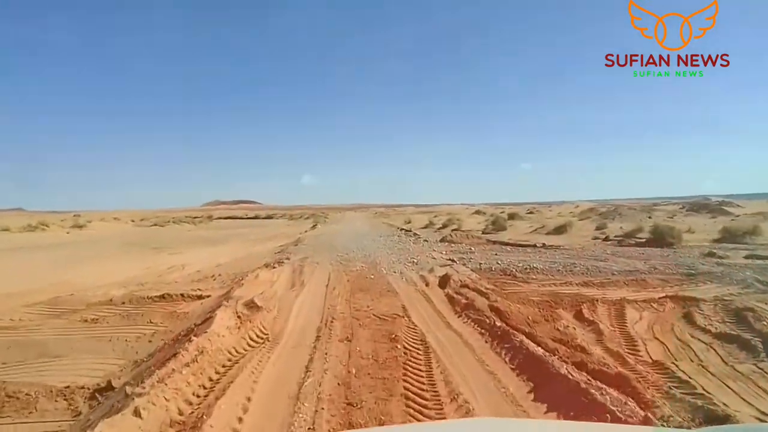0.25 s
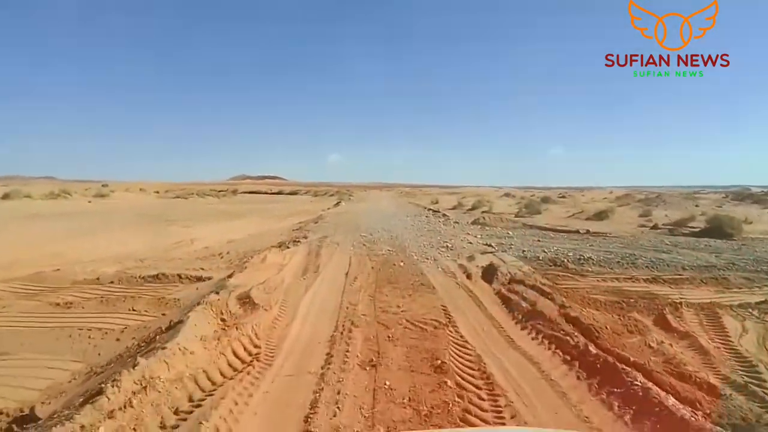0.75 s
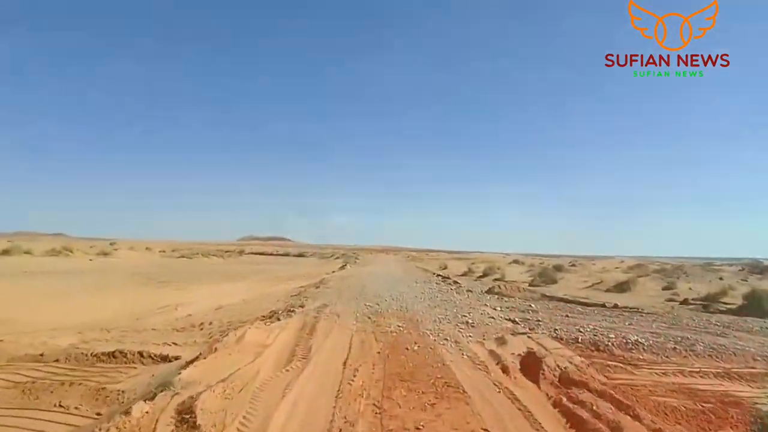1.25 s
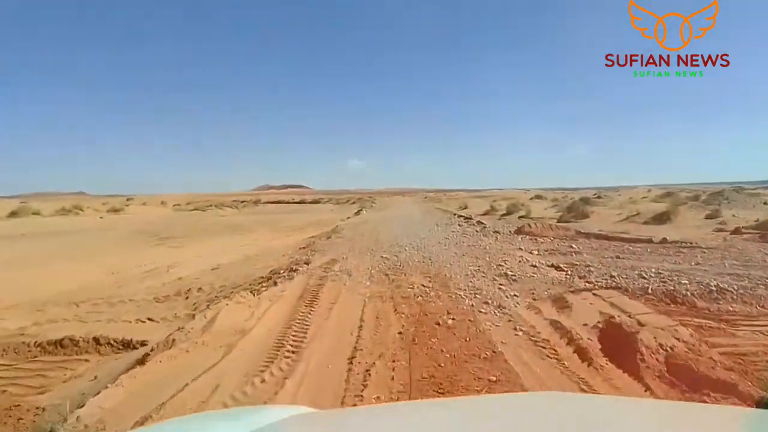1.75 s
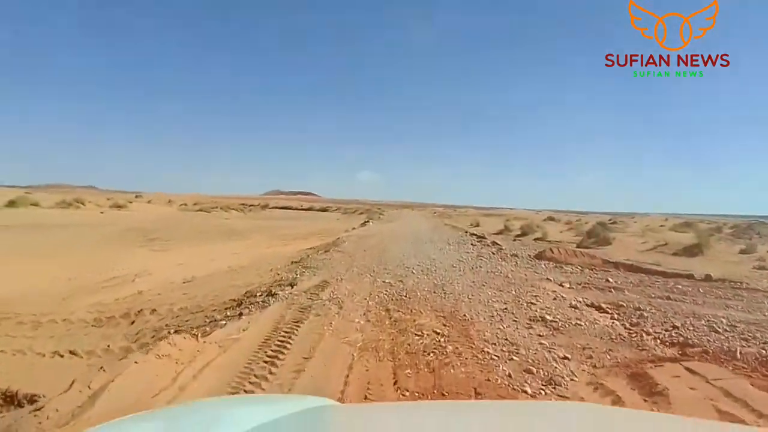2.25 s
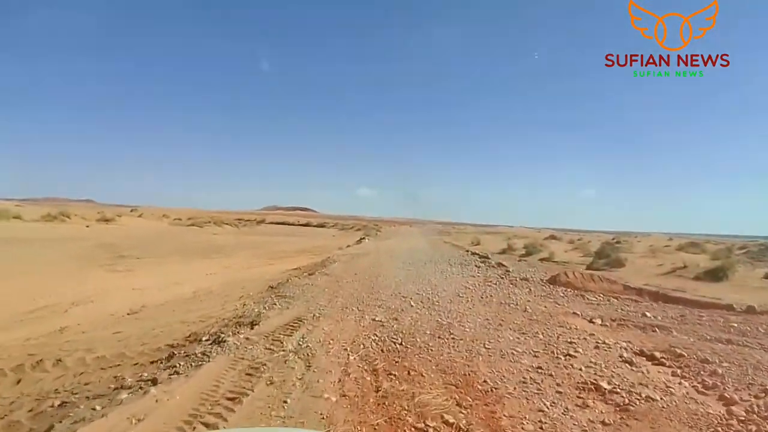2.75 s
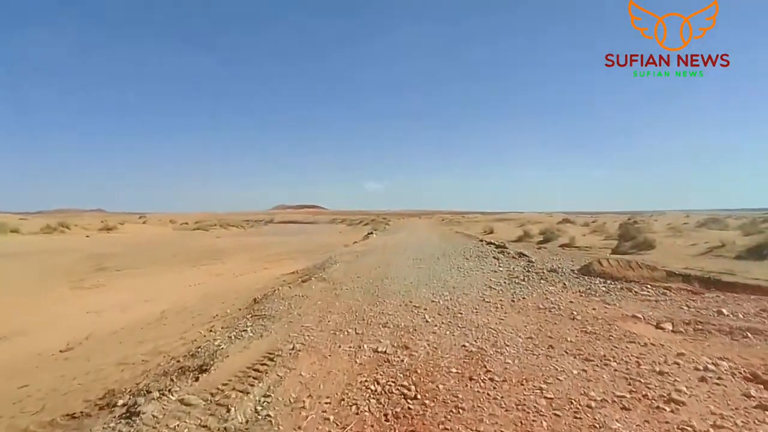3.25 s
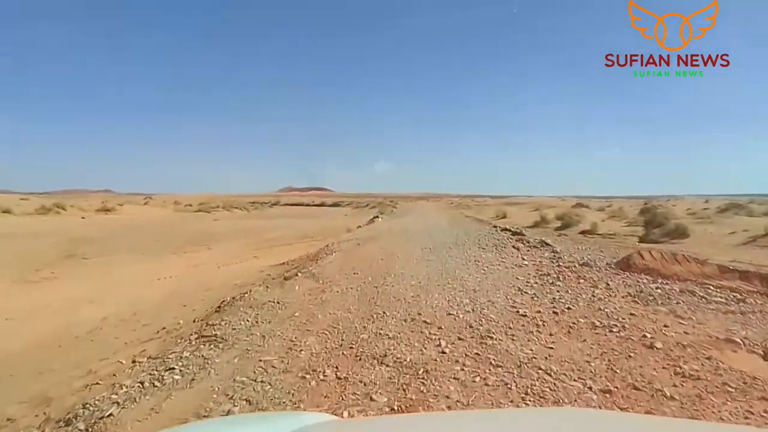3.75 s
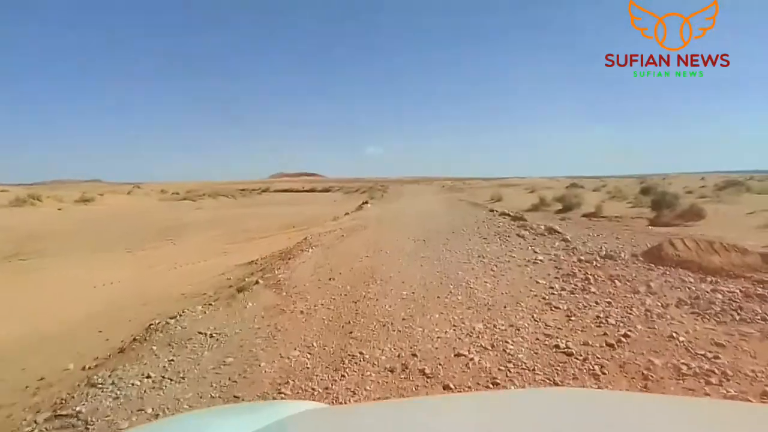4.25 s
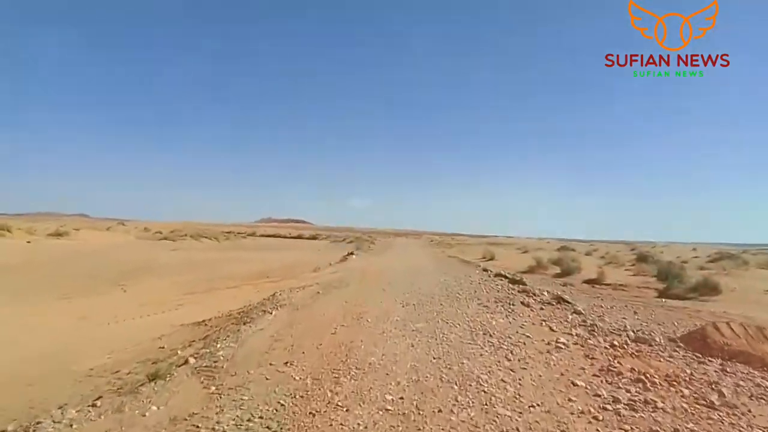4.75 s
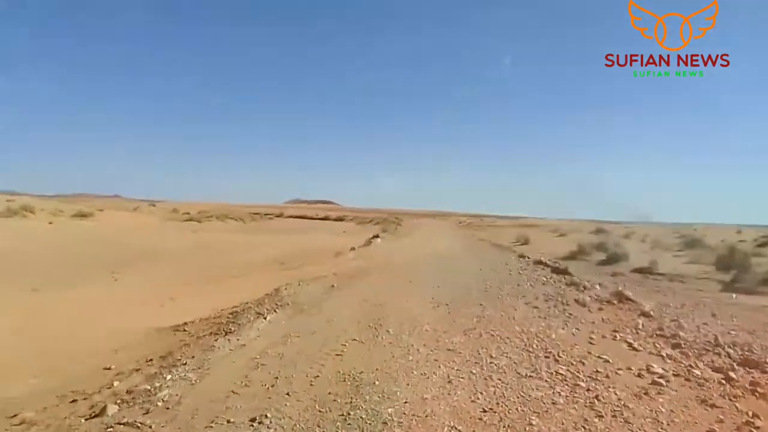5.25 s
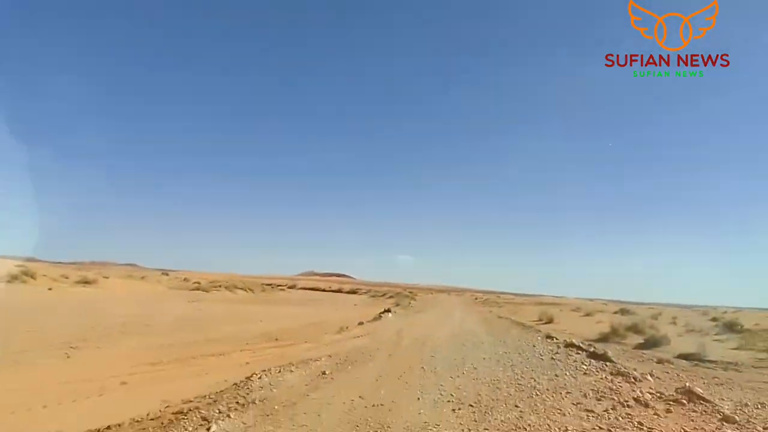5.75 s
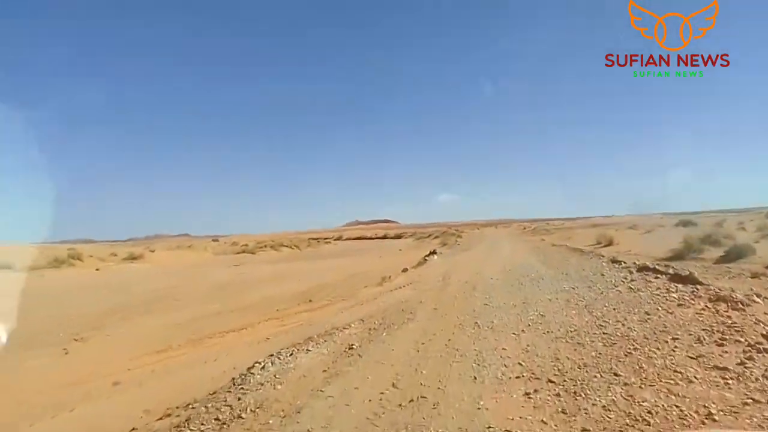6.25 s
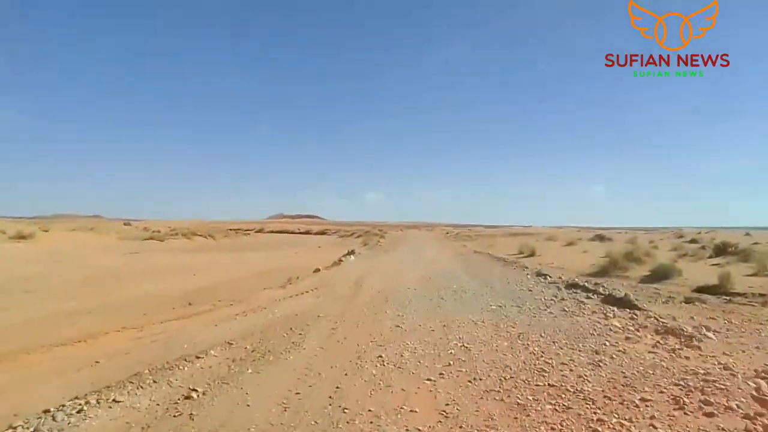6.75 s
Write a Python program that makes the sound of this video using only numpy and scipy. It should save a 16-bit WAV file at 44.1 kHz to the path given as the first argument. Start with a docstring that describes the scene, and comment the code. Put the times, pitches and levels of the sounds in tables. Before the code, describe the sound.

A car drives from soft sand onto a stony, rippled track. First there is mostly deep engine drone, body shudder and soft tread noise. Then gravel grinds, stones thump the underside, grit hisses in the wheel arches and small loose metal clinks. Panels chatter about fourteen times a second in uneven bouts. The microphone sits inside the small, damped cabin, so the outside sounds are muffled.

```python
"""Car interior, sand to washboard

Inside a car that rolls over soft sand and then, after some three seconds, onto a stony washboard track.
Engine: low sine orders. Body, cabin air and tyres: noise and random lumps through low resonances and filters.
Gravel and sand: random contacts, coloured and ringing, that crunch and tick underneath.
Trim: chatter on ripples about fourteen times a second rings the plastic panels; small loose metal jingles."""
import sys
import numpy as np
from scipy import signal
from scipy.fft import rfft, irfft, next_fast_len
from scipy.io import wavfile
from scipy.ndimage import uniform_filter1d, map_coordinates

SR = 44100
rng = np.random.default_rng(int(sys.argv[2]) if len(sys.argv) > 2 else 0)


def persist_wave(psi):
    """Save psi, clipped to +-1, as 16-bit WAV."""
    counts = np.round(np.clip(psi, -1, 1) * 32767).astype(np.int16)
    wavfile.write(sys.argv[1], SR, np.atleast_2d(counts).T)


N = 308700

# ground under the wheels: [time_s, stoniness (0-1), roughness_db]
GROUND_CURVE = [(0, 0.15, -11.5), (1, 0.12, -14), (2.3, 0.05, -14.5), (3.05, 0, -9.5), (3.3, 0.01, 2.5),
                (3.75, 1, -5), (4.1, 0.87, 1.5), (4.5, 0.93, -2), (4.9, 0.85, 0.5), (5.55, 0.88, -2),
                (6.35, 0.9, -1), (6.8, 0.94, 3.5), (7, 0.76, -1)]
# upper edges of the tread roar and of the clatter: [time_s, roar_edge_hz, clatter_edge_hz]
EDGE_CURVES = [(0, 1074, 2600), (.8, 964, 2600), (2.1, 925, 2400), (2.4, 660, 2300), (2.6, 765, 2300),
               (3.0, 740.8, 2200), (3.33, 1149, 2000), (3.48, 742, 2180), (4.0, 760, 2500),
               (4.4, 810, 2700), (4.9, 850, 3100), (5.5, 880.3, 3000), (6.3, 900, 2550), (6.7, 950, 3200),
               (7, 950, 3300)]


def trim(rise_s, fall_s):
    """Each ripple jolts the plastic panels, which chatter against their seats and ring briefly."""
    # plastic panels: [freq_hz, width_hz, lift_db]
    soft_modes = [(722, 26, 13), (1085, 18, 14.5), (1142, 20, 12), (1320, 50, 5), (1590, 34, 12),
                  (1795, 40, 5), (1904, 42, 13), (2030, 50, 6), (2190, 70, 5), (2604, 30, 7),
                  (2773, 32, 11), (3360, 45, 8), (3631, 45, 9), (3878, 35, 9)]
    # clack of the panels on their seats: [freq_hz, density_db]
    soft_spectrum = [(300, -8), (520, -2.5), (730, -5), (900, -10), (1150, -4.5), (1450, -9), (1950, -5),
                     (2650, -14.5), (3000, -44), (3800, -26), (4500, -25.5), (8000, -56.5), (14000, -69)]
    # panels against their stops: [freq_hz, width_hz, lift_db]
    hard_modes = [(2740, 63, 1.5), (4050, 90, 3.5), (5100, 110, 5), (5450, 75, 4.5), (6750, 160, 5)]
    # clack of the panels on their stops: [freq_hz, density_db]
    hard_spectrum = [(2000, 0), (2750, 9), (3100, 5.5), (4100, -0.5), (4500, -15), (4900, -5.5),
                     (5450, -4.5), (5900, -24.5), (6700, -10), (9000, -15), (10500, -41.5)]
    # contact with the stops, and buzz in between: [time_s, hard_contact_db, buzz_db]
    hard_curve = [(4.88, -59, -83), (4.99, -40, -82), (5.12, -48, -89), (5.29, -41, -76), (5.5, -43, -86),
                  (6.45, -48.5, -76), (6.62, -35, -58), (6.78, -27.5, -57.5), (7, -38, -49)]

    shake = ripple_shake(rise_s, fall_s)
    chatter = even(grains(per_s=1700, spread_db=-0.5), span_s=0.0027)
    contacts = shake * chatter * from_db(0.75 * drift(60))

    soft = colour(ring(contacts, soft_modes, vary_db=3), soft_spectrum)
    soft = dull_above(soft, in_time(EDGE_CURVES)[1], treble_db=-13.5)

    hard_db, buzz_db = in_time(hard_curve)
    buzz = from_db(buzz_db) * stoniness() * chatter
    hard = ring(from_db(hard_db) * contacts + buzz, hard_modes, vary_db=2.5)
    return from_db(-17.5) * soft + colour(hard, hard_spectrum)


def ripple_shake(rise_s, fall_s):
    """Washboard jolts: each rises, holds while the tyre is on the crest, and falls."""
    # ripples: [start_s, contact_s, level_db]
    ripples = [(3.546, 0.035, -27.5), (3.618, 0.018, -16), (3.696, .032, -23.5), (3.808, 0.022, -35.5),
               (4.135, 0.051, -35.5), (4.205, 0.016, -36), (4.47, 0.013, -27), (4.604, 0.018, -17),
               (4.644, 0.0081, -17.5), (4.685, 0.021, -20), (4.758, 0.021, -16.5), (4.837, 0.035, -14.5),
               (4.907, 0.03, -17), (4.978, 0.03, -17.5), (5.055, 0.016, -25.5), (5.133, 0.022, -22),
               (5.205, 0.035, -19.5), (5.273, 0.057, -19), (5.364, 0.033, -14.5), (5.44, 0.024, -20),
               (5.868, 0.039, -30.5), (5.922, 0.031, -32), (5.994, 0.021, -27.5), (6.075, 0.016, -33),
               (6.153, 0.036, -24), (6.223, 0.021, -25), (6.415, 0.017, -31.5), (6.538, 0.024, -20),
               (6.616, 0.022, -16.5), (6.694, 0.015, -16.5), (6.767, 0.028, -15.5), (6.839, 0.04, -18.5),
               (6.909, 0.026, -11.5), (6.984, .025, -9.5)]
    t, shake = np.arange(N) / SR, np.zeros(N)
    for start_s, contact_s, level_db in ripples:
        first = int(start_s * SR)
        near = slice(first, first + SR // 5)
        age_s = np.maximum(t[near] - start_s, 0)
        rise = 1 - np.exp(-age_s / rise_s)
        fall = np.exp(-np.maximum(age_s - contact_s, 0) / fall_s)
        shake[near] += from_db(level_db) * rise * fall
    return shake


def body():
    """The shell shudders on its springs and the cabin air booms, far more on stones than on sand."""
    shudder_db, boom_db, sand_damping_db = -21.5, -23.5, 3  # levels at roughness and sway 0 dB
    rough_db, sway_db, _ = ride()
    motion_db = rough_db + sway_db
    boom_db = boom_db + motion_db - sand_damping_db * (1 - stoniness())
    shudder = from_db(shudder_db + motion_db) * body_mode(hz=23.5, width_hz=14)
    return shudder + from_db(boom_db) * body_mode(hz=61, width_hz=24)


def body_mode(hz, width_hz):
    """A low mode kept swinging by noise from the uneven ground."""
    noise = rng.standard_normal(N + SR)  # the first second lets the mode settle
    swing = resonate(resonate(noise, hz, width_hz), hz, width_hz)[SR:]
    return even(swing, span_s=0.23)


def tyres():
    """Lumps drum on the carcasses; the tread roars dully through the floor."""
    # carcass drumming: [freq_hz, density_db]
    drum_spectrum = [(40, -12), (60, -16.5), (82, -7), (102, 1), (118, 0), (142, 2), (175, -3.5), (215, -5),
                     (260, -11.5), (340, -28.5)]
    # tread roar: [freq_hz, density_db]
    roar_spectrum = [(200, -20), (280, 2), (350, 0), (480, -6), (550, -8), (650, -11.5), (850, -14.5),
                     (1150, -25), (1500, -31.5)]
    drum_db, roar_db, roar_follows = -22.5, -33, 0.67  # levels at roughness and load 0 dB

    rough_db, _, load_db = ride()
    push_db = rough_db + load_db
    drum = even(colour(grains(per_s=900, spread_db=3), drum_spectrum), span_s=0.14)
    roar = even(colour(grains(per_s=2500, spread_db=2.5), roar_spectrum), span_s=0.089)
    roar = roar * from_db(1.9 * drift(14))
    roar = dull_above(roar, in_time(EDGE_CURVES)[0], treble_db=-23.0)
    return from_db(drum_db + push_db) * drum + from_db(roar_db + roar_follows * push_db) * roar


def engine():
    """Four cylinders heard through the bulkhead: low sine orders that waver and flutter."""
    # engine: [time_s, firing_hz, level_db]
    engine_curve = [(0, 59.8, -31), (.35, 62.2, -34.5), (.62, 56.96, -34), (.88, 60.67, -31.5),
                    (1.2, 64.8, -31.5), (2.0, 64.52, -31), (2.35, 64.55, -35), (2.65, 62.23, -31.5),
                    (3.7, 60.8, -40.5), (4.05, 66, -29.5), (4.4, 62.94, -36), (5.85, 61.4, -29),
                    (6.3, 64.97, -31), (7, 66.17, -33)]
    # engine orders: [multiple of the firing rate, level_db]
    order_levels = [(.5, -8.5), (1, 1.5), (1.5, -10), (2, -9), (2.5, -23.5), (3, -13.5), (3.5, -21.5),
                    (4, -22), (4.5, -20), (5, -21), (6, -23.5), (7, -22), (7.5, -21), (8, -24), (10, -24)]
    waver_db, flutter_db, flutter_per_s = 1.5, 1.5, 22

    firing_hz, engine_db = in_time(engine_curve)
    jitter = 0.0051 * drift(8) + 0.0065 * drift(flutter_per_s)
    phase = 2 * np.pi * np.cumsum(firing_hz * (1 + jitter)) / SR
    orders = 0
    for multiple, level_db in order_levels:
        order = round(2 * multiple) / 2
        order_db = level_db + waver_db * drift(7) + flutter_db * drift(flutter_per_s)
        orders = orders + from_db(order_db) * np.sin(order * phase + rng.uniform(0, 2 * np.pi))
    return np.sqrt(2) * from_db(engine_db) * orders


def gravel():
    """Stones grind under the tread, grit sprays into the wheel arches, pebbles tick."""
    # wheel-arch liners: [freq_hz, width_hz, lift_db]
    arch_modes = [(1085, 20, 4), (1310, 90, 1), (1904, 45, 3), (3360, 60, 3), (3631, 50, 4), (3878, 50, 4)]
    # stones under the tyres: [time_s, crunch_db, grit_db]
    stone_curve = [(0, -58.5, -83.5), (.8, -63.5, -95.5), (2, -62, -94), (3.05, -60.5, -86.5),
                   (3.3, -60, -73.5), (3.45, -44, -69.5), (3.6, -39, -67.5), (3.9, -40, -82),
                   (4.15, -37, -51.5), (4.55, -37, -57.5), (4.7, -36, -57.5), (4.82, -34.5, -70),
                   (5.12, -35.5, -67.5), (5.42, -36.5, -55), (5.65, -38.5, -59.5), (6.1, -38.5, -62.5),
                   (6.36, -39.5, -79), (6.5, -33.5, -61), (6.65, -32.5, -53.5), (7, -32, -51)]
    crunch_db, grit_db = in_time(stone_curve)
    flung_stones, flung_grit = spray()
    crunch = stone_crunch() * np.hypot(from_db(crunch_db), flung_stones)
    crunch = hollow_out(crunch)
    grit = arch_hiss(flying_grit() * np.hypot(from_db(grit_db), flung_grit))
    in_arches = ring(from_db(0.5) * crunch + from_db(-2.5) * grit, arch_modes, vary_db=2.0)
    return in_arches + from_db(9.5) * pebble_ticks()


def stone_crunch():
    """Stones grind and clack under the tread; sand cushions them and dulls the crunch."""
    # grinding stones: [freq_hz, density_db]
    crunch_spectrum = [(400, -6), (620, -0.5), (900, -1.5), (1120, -0.5), (1330, 5.5), (1520, -1.5),
                       (1900, -6), (2500, -11), (2950, -35), (4500, -52.5)]
    stony = stoniness()
    grinding = colour(grains(per_s=1000, spread_db=0.0) * from_db(1.5 * drift(18)), crunch_spectrum)
    clacks = own_pitches(grains(per_s=110, spread_db=1.5), low_hz=650, high_hz=2400, q=24)
    crunch = from_db(-0.3) * grinding + from_db(-6) * stony * clacks
    crunch = crunch * tyre_grip()
    muffled = signal.sosfilt(signal.butter(2, 1700, fs=SR, output="sos"), crunch)
    crunch = np.sqrt(stony) * crunch + np.sqrt(1 - stony) * muffled
    return dull_above(crunch, in_time(EDGE_CURVES)[1], treble_db=-7)


def tyre_grip():
    """Gain of the crunch: the tyres bite on each crest and go light in the trough beside it."""
    ripple_period_s, swing_db, onset_db = .072, 2.5, -28
    shake = ripple_shake(rise_s=.004, fall_s=.008)
    usual = uniform_filter1d(shake, int(ripple_period_s * SR))
    return from_db(swing_db * (shake - usual) / (usual + from_db(onset_db)))


def hollow_out(crunch):
    """The crunch turns hollow at times, as a band near 1500 Hz is subtracted."""
    # hollowness: [time_s, depth of the dip (0-1)]
    hollow_curve = [(3.6, 0), (4, 1), (4.5, 0.39), (4.8, 0.23), (5.95, 0), (6.15, 0.99), (6.5, 0.93),
                    (6.7, 0.35)]
    depth = np.clip(in_time(hollow_curve)[0], 0, 1)
    return crunch - depth * resonate(crunch, hz=1500, width_hz=320)


def flying_grit():
    """Clumps of flying grains, fewer on soft sand, so that each is heard more singly."""
    # grit: [freq_hz, density_db]
    grit_spectrum = [(1500, -5), (2600, 6.5), (3050, -7), (3550, 1), (4000, -1), (4400, -16), (5300, -13.5),
                     (6100, -21), (7100, -19.5), (9000, -32.5), (15000, -33.5)]
    contacts = grains(per_s=500 + 4000 * stoniness(), spread_db=4.0)
    return colour(even(contacts * from_db(3.7 * drift(15)), span_s=0.1), grit_spectrum)


def arch_hiss(grit):
    """On stones the grit hisses in the wheel arches: a narrow band with a moving centre is added."""
    # hiss in the wheel arches: [time_s, centre_hz]
    hiss_curve = [(3.6, 3880), (4.45, 3930), (4.9, 3760), (5.35, 3490), (5.6, 3430), (5.9, 3690),
                  (6.2, 3800), (7, 3750)]
    band = moving_band(grit, in_time(hiss_curve)[0], width_hz=160)
    return grit + from_db(6) * stoniness() * band


def spray():
    """Gains of the stones and of the grit flung up into the wheel arches."""
    # sprays: [centre_s, half_length_s, stones_db, grit_db]
    sprays = [(0.118, 0.0081, -50, -78), (0.23, 0.016, -56, -88), (2.652, 0.015, -52, -76),
              (3.164, 0.01, -53, -71), (3.285, 0.014, -46.5, -78), (3.333, 0.015, -41, -83),
              (3.561, 0.016, -34.5, -71), (3.64, 0.017, -33, -46.5), (4.005, 0.033, -32, -57),
              (4.145, 0.056, -31, -45), (4.264, 0.0099, -34.5, -47.5), (4.427, 0.0072, -29.5, -49),
              (4.99, 0.019, -29.5, -62), (5.284, 0.023, -34.5, -45), (5.837, 0.094, -38, -50.5)]
    centre_s, half_s, stones_db, grit_db = np.transpose(sprays)
    return swells(centre_s, half_s, from_db(stones_db)), swells(centre_s, half_s, from_db(grit_db))


def pebble_ticks():
    """Pebbles skitter along the underside, each a short patter of tiny contacts."""
    # pebbles: [start_s, level_db]
    set_pebbles = [(.09, -60.5), (.283, -63), (.553, -67), (.655, -59.5), (.735, -68), (.782, -67),
                   (.952, -64), (1.005, -63), (1.04, -67), (1.1, -65), (1.142, -72), (1.262, -63),
                   (1.303, -65), (1.35, -68), (1.398, -69), (1.5, -73), (1.57, -69), (1.6, -70),
                   (1.635, -65), (1.975, -68), (2.29, -71), (2.62, -65), (2.707, -63.5), (3.42, -53),
                   (3.479, -49.5), (3.722, -53.5), (3.848, -60), (4.262, -49), (4.582, -54), (4.652, -45.5),
                   (5.056, -51), (5.94, -49), (6.49, -49), (6.672, -44)]
    # pebble tick: [freq_hz, density_db]
    tick_spectrum = [(600, -5), (1350, 4.5), (2200, -6.5), (4000, -10.5), (5500, -18), (8300, -19.5),
                     (12000, -40)]
    rows = set_pebbles + stray_pebbles()
    return colour(skitter(rows, rise_s=0.00081, decay_s=0.009), tick_spectrum)


def stray_pebbles():
    """Small pebbles fly up at random, harder on stony ground: rows of (start_s, level_db)."""
    per_s, sand_db, stones_add_db, spread_db = 8.5, -80.5, 12, 3
    at = np.flatnonzero(rng.random(N) < per_s / SR)
    level_db = sand_db + stones_add_db * stoniness() + spread_db * rng.standard_normal(N)
    return list(zip(at / SR, level_db[at]))


def stone_knocks():
    """Larger stones hit the damped floor pan with a short, dull knock."""
    # knocks: [start_s, level_db]
    knocks = [(3.395, -34.5), (3.422, -31), (3.453, -32), (3.479, -17.5), (3.579, -26.5), (3.697, -21.5),
              (4.074, -30.5), (4.143, -18), (4.769, -29), (4.92, -22), (5.136, -31), (5.173, -24.5),
              (5.584, -25.5), (6.266, -39.5), (6.296, -31.5), (6.772, -20), (6.843, -18)]
    # floor pan: [freq_hz, density_db]
    knock_spectrum = [(250, -6), (600, 3.5), (900, -2), (1250, 5.5), (1900, -8.5), (2300, -22), (2900, -31),
                      (5000, -43), (12000, -57)]
    return from_db(15.0) * colour(blows(knocks, decay_s=0.006, scatter=0.18), knock_spectrum)


def loose_metal():
    """Small metal parts tremble on the stones and under each spray, clink, and ping faintly."""
    # loose metal knocking: [start_s, level_db]
    jingles = [(3.477, -58.5), (3.6346, -58), (3.7439, -44), (3.8122, -39), (3.8886, -47), (3.9772, -40.5),
               (4.1116, -39), (4.2579, -56), (5.2754, -54), (5.5832, -45.5), (5.7903, -32.5), (5.8817, -44),
               (6.114, -44), (6.2076, -39), (6.548, -47), (6.6707, -45)]
    # loose metal: [freq_hz, width_hz, lift_db]
    metal_modes = [(3980, 90, 9), (7140, 90, 5), (7384, 80, 4), (7555, 80, 4), (7990, 80, 6),
                   (8384, 100, 7), (8600, 100, 4)]
    # metal tick: [freq_hz, density_db]
    tick_spectrum = [(3000, -18.5), (3900, -9.5), (4600, -16), (6200, -17.5), (7100, -12.5), (8300, 9),
                     (8900, -8), (10000, -25.5), (15000, -34.5)]
    # pings of a metal ring: [start_s, level_db]
    ping_rows = [(1.71, -75), (1.77, -75), (1.89, -77), (2.823, -64), (2.91, -62), (2.95, -69),
                 (3.045, -71), (3.075, -69), (3.232, -70), (6.284, -60), (6.316, -52)]
    tremble_db, spray_db = -71, -12.5  # spray against its grit

    rough_db, _, _ = ride()
    drive = from_db(tremble_db + rough_db) + from_db(spray_db) * spray()[1]
    patter = even(grains(per_s=1200, spread_db=3.5) * from_db(4.5 * drift(30)), span_s=0.09)
    tremble = stoniness() ** 2 * drive * patter
    contacts = tremble + from_db(0.5) * blows(jingles, decay_s=0.0059, scatter=0.3)
    jingle = colour(ring(contacts, metal_modes, vary_db=1.5), tick_spectrum)
    pings = resonate(blows(ping_rows, decay_s=.012, scatter=.05), hz=4030, width_hz=55)
    return from_db(0.5) * jingle + from_db(40) * pings


def showers():
    """Fine grit sweeps over the sheet metal in bright surges."""
    # surges: [centre_s, half_length_s, level_db]
    surges = [(4.026, 0.018, -51), (4.147, 0.03, -46.5), (4.263, .014, -50.5), (4.313, 0.079, -67),
              (5.81, 0.019, -52), (5.9, 0.042, -61)]
    # hiss of the grit: [freq_hz, density_db]
    hiss_spectrum = [(5000, -12.5), (6300, -13), (7000, 3), (8300, -0.5), (9300, -3), (10500, -19),
                     (12000, -28), (15000, -23)]
    centre_s, half_s, level_db = np.transpose(surges)
    patter = even(grains(per_s=3400, spread_db=3.5), span_s=0.033)
    return swells(centre_s, half_s, from_db(level_db)) * colour(patter, hiss_spectrum)


def sand():
    """Fine grains crackle against the underside in small uneven clumps."""
    # sand crackle: [time_s, level_db]
    sand_curve = [(0, -74), (.35, -73), (1.1, -72), (1.6, -71), (1.8, -74), (2.1, -74), (2.45, -70),
                  (3, -72), (3.3, -69)]
    # sand crackle: [freq_hz, density_db]
    crackle_spectrum = [(1300, 2), (2300, 3), (3200, -3), (4200, -4), (5500, -10.5), (8300, -9),
                        (11000, -14.5)]
    clumps = even(grains(per_s=3500, spread_db=4.5) * from_db(3.4 * drift(24)), span_s=0.08)
    crackle = own_pitches(clumps, low_hz=1410, high_hz=8500, q=14)
    return from_db(in_time(sand_curve)[0]) * rms_one(colour(crackle, crackle_spectrum))


def cabin(x, t60_s, wet_db):
    """Dense, quickly dying reflections from glass and seats."""
    age_s = np.arange(SR // 5) / SR
    tail = rng.standard_normal(len(age_s)) * from_db(-60 * age_s / t60_s) * (age_s > .002)
    tail = tail / np.sqrt(np.sum(tail ** 2))
    return x + from_db(wet_db) * signal.fftconvolve(x, tail)[:N]


def ride():
    """Roughness of the ground, and the extra sway and tyre load from the bumps, all in dB."""
    # humps and ruts: [centre_s, half_length_s, sway_db, load_db]
    bumps = [(0.225, 0.13, 6, 0.5), (0.416, 0.037, 13.5, 5.5), (1.324, 0.049, 3, -1), (2.022, 0.037, 10, 2),
             (3.325, 0.072, -2, -4), (3.472, 0.047, -7.5, 9), (3.651, 0.11, 0, 8), (3.842, 0.036, 10, -0.5),
             (4.014, 0.098, 9, 2), (4.63, 0.044, 4.5, 2.5), (4.961, 0.034, 1, 5.5), (5.23, 0.05, 5.5, 6),
             (5.812, 0.13, 6.5, 4), (6.632, 0.049, 2, 1)]
    centre_s, half_s, sway_db, load_db = np.transpose(bumps)
    rough_db = in_time(GROUND_CURVE)[1]
    return rough_db, swells(centre_s, half_s, sway_db), swells(centre_s, half_s, load_db)


def stoniness():
    """0 on soft sand, 1 on bare stones."""
    return np.clip(in_time(GROUND_CURVE)[0], 0, 1)


def grains(per_s, spread_db):
    """Random contacts of uneven size; rms 1."""
    sizes = from_db(spread_db * np.minimum(rng.exponential(1, N), 4)) * rng.choice([-1, 1], N)
    return rms_one(sizes * (rng.random(N) < per_s / SR))


def click_train(rows):
    """One-sample clicks from rows of (start_s, level_db)."""
    clicks = np.zeros(N)
    for start_s, level_db in rows:
        clicks[int(start_s * SR)] = from_db(level_db)
    return clicks


def decay(clicks, tau_s):
    """Exponential decay after each click."""
    return signal.lfilter([1], [1, -np.exp(-1 / (tau_s * SR))], clicks + 1e-18)


def blows(rows, decay_s, scatter):
    """A sharp contact at each time, followed by a dying patter of smaller ones."""
    clicks = click_train(rows)
    return clicks + scatter * decay(clicks, decay_s) * grains(per_s=490, spread_db=-4.0)


def skitter(rows, rise_s, decay_s):
    """A quick swell and fade of many tiny contacts at each time."""
    clicks = click_train(rows)
    envelope = decay(clicks, decay_s) - decay(clicks, rise_s)
    return envelope * even(grains(per_s=1200, spread_db=-1.5), span_s=0.011)


def own_pitches(clicks, low_hz, high_hz, q):
    """Every contact rings briefly at one of 16 pitches, dealt at random; rms 1."""
    pitches_hz = np.geomspace(low_hz, high_hz, 16)
    dealt = rng.integers(0, len(pitches_hz), N)
    total = 0
    for k, hz in enumerate(pitches_hz):
        total = total + resonate(clicks * (dealt == k), hz, hz / q) / np.sqrt(hz)
    return rms_one(total)


def resonate(x, hz, width_hz):
    """Two-pole resonance with gain 1 at its top."""
    r = np.exp(-np.pi * width_hz / SR)
    zeros = np.array([1, 0, -1]) * (1 - r * r) / 2
    poles = [1, -2 * r * np.cos(2 * np.pi * hz / SR), r * r]
    return signal.lfilter(zeros, poles, x + 1e-18)


def ring(x, modes, vary_db):
    """Each mode in turn lifts a narrow peak, more or less as the point of contact moves."""
    for hz, width_hz, lift_db in modes:
        lift = from_db(lift_db + vary_db * np.clip(drift(7), -2, 2)) - 1
        x = x + resonate(x * lift, hz, width_hz)
    return x


def moving_band(x, hz, width_hz):
    """A resonance whose centre follows a curve: shift to 0 Hz, low-pass, shift back."""
    turn = np.exp(2j * np.pi * np.cumsum(hz) / SR)
    r = np.exp(-np.pi * width_hz / SR)
    return 2 * np.real(turn * signal.lfilter([1 - r], [1, -r], x / turn))


def colour(x, spectrum):
    """Causal (minimum-phase) filter with the given spectrum, falling ends and unit energy."""
    size = 2 * next_fast_len(N)
    hz, db = np.transpose(spectrum)
    f = np.fft.rfftfreq(size, 1 / SR) + 1
    gain = from_db(np.interp(np.log(f), np.log(hz), db))
    low_end, high_end = 1 + (hz[0] / f / 2) ** 4, 1 + (f / hz[-1] / 2) ** 4
    gain = rms_one(gain / low_end / high_end)
    # folding the cepstrum gives the minimum phase
    cepstrum = irfft(np.log(gain + 1e-9), size)
    cepstrum[1:size // 2] *= 2
    cepstrum[size // 2 + 1:] = 0
    return irfft(rfft(x, size) * np.exp(rfft(cepstrum)), size)[:N]


def dull_above(x, edge_hz, treble_db):
    """Turn down everything above a moving edge, by fading between steep low-passes."""
    edges_hz, low = np.geomspace(edge_hz.min(), edge_hz.max(), 7), 0
    for hz, share in zip(edges_hz, np.eye(len(edges_hz))):
        lowpass = signal.butter(10, hz, fs=SR, output="sos")
        low = low + np.interp(edge_hz, edges_hz, share) * signal.sosfiltfilt(lowpass, x)
    return low + from_db(treble_db) * (x - low)


def swells(centre_s, half_s, height):
    """Sum of smooth bell-shaped rises and falls."""
    t = np.arange(0, N, 40) / SR
    bells = sum(h * np.exp(-((t - at) / half) ** 2) for at, half, h in zip(centre_s, half_s, height))
    return np.interp(np.arange(N) / SR, t, bells)


def drift(rate):
    """Smooth chance with rms 1, from two random knots per cycle of the rate in Hz."""
    knots = rng.standard_normal(4000)
    return rms_one(map_coordinates(knots, [np.arange(N) / SR * rate * 2], order=1, mode="wrap"))


def even(x, span_s):
    """Hold the rms near 1 over the given span."""
    size = max(int(span_s * SR), 2)
    power = uniform_filter1d(uniform_filter1d(x * x, size), size)
    return x / np.sqrt(np.abs(power) + 1e-12)


def in_time(rows):
    """Each column of a curve table, sample by sample."""
    time_s, *columns = np.transpose(rows)
    return [np.interp(np.arange(N) / SR, time_s, c) for c in columns]


def rms_one(x):
    """Scale to rms 1."""
    return x / np.sqrt(np.mean(x ** 2) + 1e-20)


def from_db(db):
    """Decibels to gain."""
    return 10 ** (np.asarray(db) / 20)


def scene():
    """Everything as it reaches a microphone behind the windscreen."""
    clatter = trim(rise_s=0.0024, fall_s=0.0074) + gravel() + stone_knocks()
    clatter = clatter + loose_metal() + showers() + sand()
    clatter = from_db(-4.0) * cabin(clatter, t60_s=0.056, wet_db=-12.5)
    hiss = from_db(-96.5) * rng.standard_normal(N)
    return (clatter + body() + tyres() + engine() + hiss)[None]


def record(dry):
    """The microphone drops the deepest sway, the ends are eased and the top is cut."""
    x = signal.sosfilt(signal.butter(2, 14, "high", fs=SR, output="sos"), dry)
    x = x * signal.windows.tukey(N, .001)
    return signal.sosfilt(signal.cheby2(12, 70, 15500, fs=SR, output="sos"), x)


dry = scene()
out = record(dry)
persist_wave(out)
```